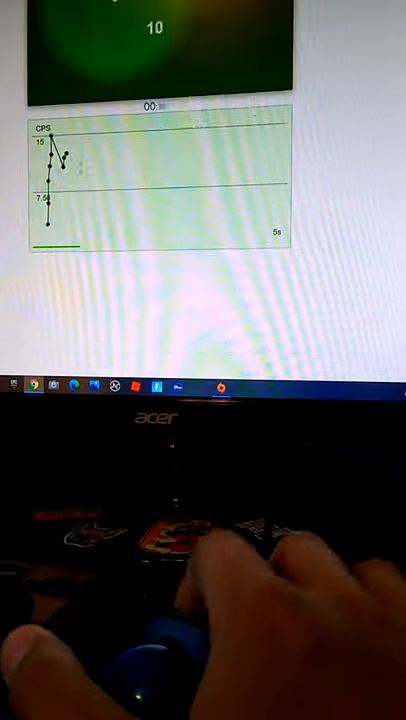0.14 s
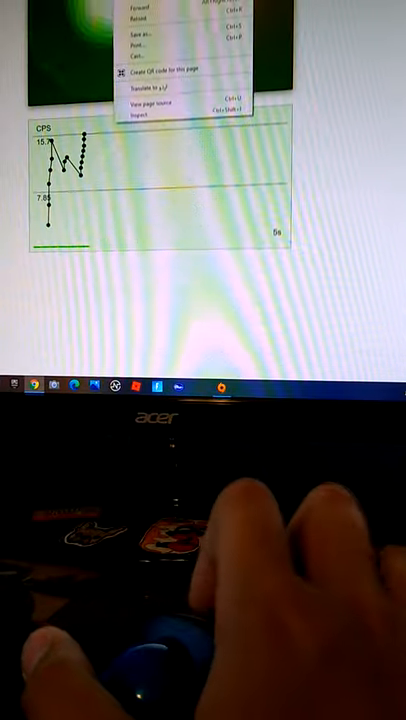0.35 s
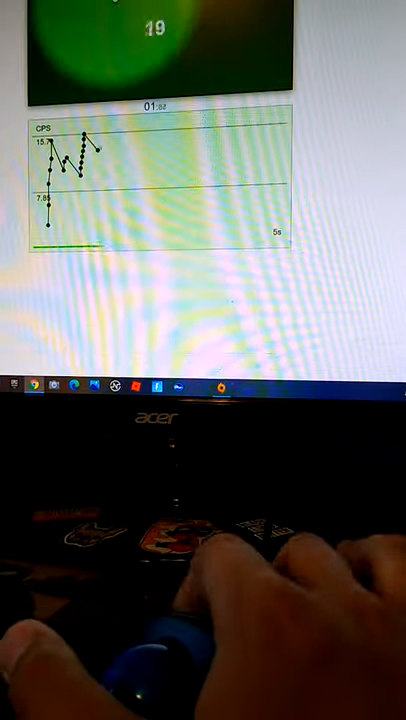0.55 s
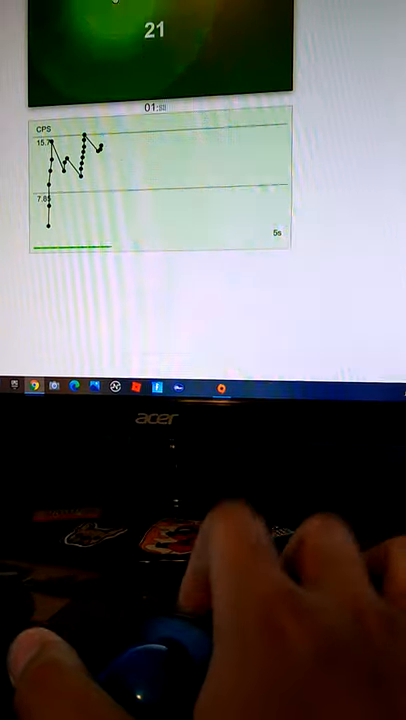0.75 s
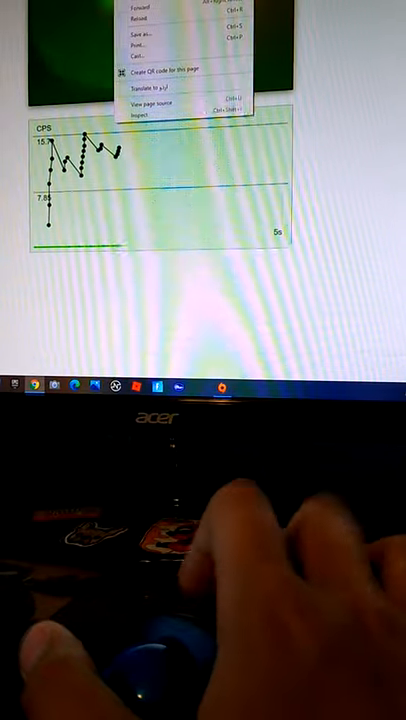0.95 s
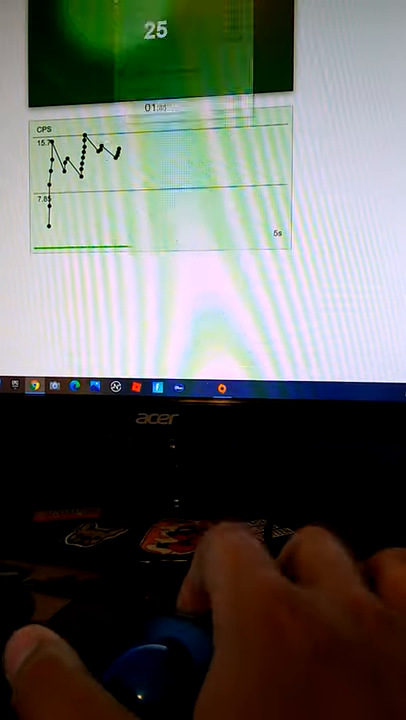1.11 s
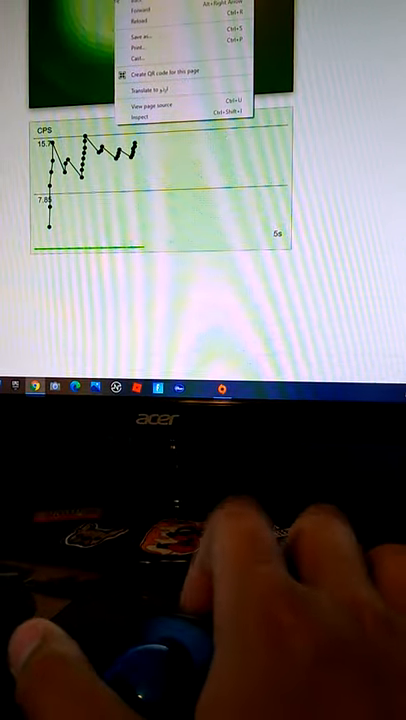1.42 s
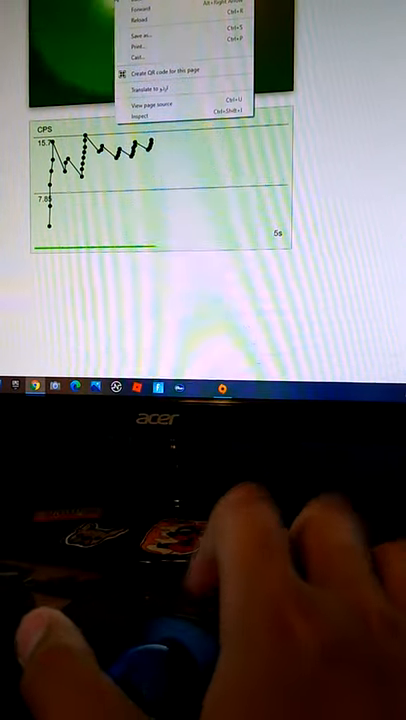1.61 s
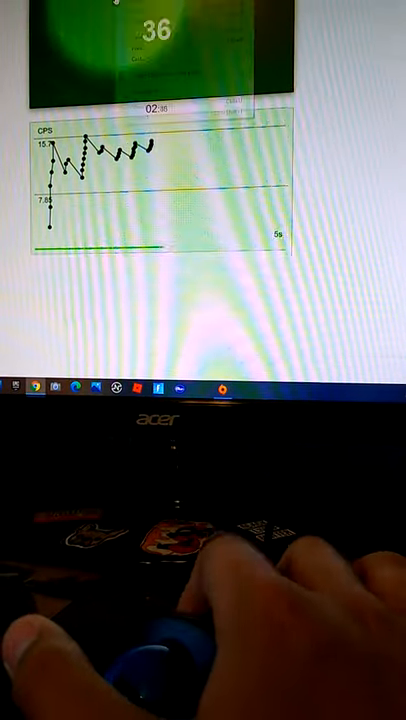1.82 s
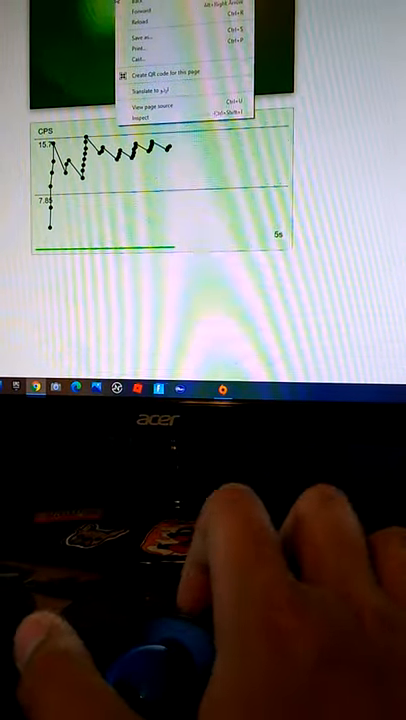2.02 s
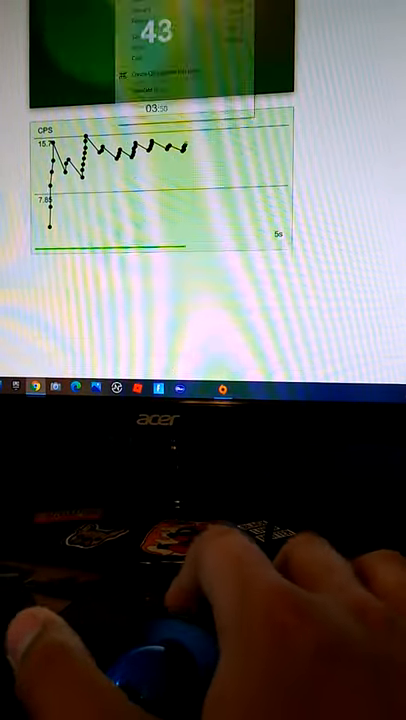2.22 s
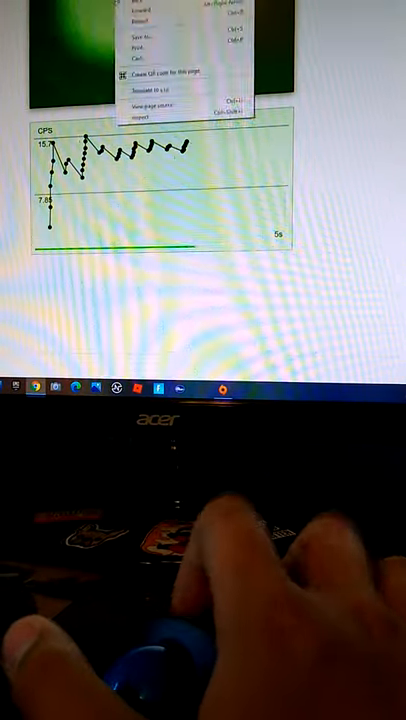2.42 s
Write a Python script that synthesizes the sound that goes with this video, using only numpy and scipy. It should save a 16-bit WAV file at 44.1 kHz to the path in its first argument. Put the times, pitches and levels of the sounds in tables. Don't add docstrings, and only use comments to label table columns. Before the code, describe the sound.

A finger drags over a mouse button, making quick bursts of plastic clicks above faint fan hum

```python
import sys
import numpy as np
from scipy import signal
from scipy.fft import rfft, irfft
from scipy.io import wavfile

SR = 44100
rng = np.random.default_rng(int(sys.argv[2]) if len(sys.argv) > 2 else 0)


def store_wav(level_fs):
    pcm = np.round(np.clip(np.atleast_2d(level_fs), -1, 1) * 32767)
    wavfile.write(sys.argv[1], SR, pcm.T.astype(np.int16))


def rack_gain(trim_db):
    fader = np.asarray(trim_db, float)
    return 10 ** (fader / 20)


N = 112454


def band(x, hz, width):
    return signal.lfilter(*signal.iirpeak(hz, hz / width, fs=SR), x)


def tone():
    # f/Hz, level/dB per Hz
    air_curve = [(25, -105), (50, -84), (150, -93), (300, -99), (480, -109), (1300, -111), (6500, -123),
                 (16000, -123)]
    # f/Hz, width/Hz, left/dB, right/dB
    hum_bands = [(222, 30, -74.5, -77), (404.6, 22, -85, -80.5), (2940, 920, -93, -83),
                 (5250, 780, -98, -91), (12900, 3700, -85.5, -105)]
    fan_hz, fan_db, stir_db = 214.7, -67.5, 3

    hz = np.maximum(np.fft.rfftfreq(N, 1 / SR), 1)
    curve_hz, curve_db = np.array(air_curve).T
    power = rack_gain(2 * np.interp(np.log(hz), np.log(curve_hz), curve_db))
    for centre_hz, width, left_db, right_db in hum_bands:
        peak = rack_gain(2 * np.array([[left_db], [right_db]])) / width
        power = power + peak / (1 + (2 * (hz - centre_hz) / width) ** 4)

    alike = np.clip(1 - np.log2(hz / 300) / 2.36, 0, 0.9)
    both, own = rfft(rng.standard_normal(N)), rfft(rng.standard_normal((2, N)))
    mix = np.sqrt(alike) * both + np.sqrt(1 - alike) * own
    air = irfft(np.sqrt(power * SR / 2) * mix, N)

    t = np.arange(N) / SR
    stir, wobble = (np.interp(t * 25, np.arange(70), rng.standard_normal(70)) for _ in range(2))
    sleeve = band(air, 2900, 4800) * (rack_gain(stir_db * stir) - 1)
    fan_phase = 2 * np.pi * np.cumsum(fan_hz * (1 + 0.001 * stir)) / SR
    fan = rack_gain(fan_db + 1.1 * wobble) * np.sin(fan_phase)
    return air + sleeve + fan


def rattle(times, db, bands, fall_s, lead_s, grain_db, rub_db):
    edge_s, rub_s = 0.0005, 0.026
    t = np.arange(int(0.05 * SR)) / SR
    hits = np.zeros(N)
    hits[(np.maximum(times - lead_s, 0) * SR).astype(int)] = rack_gain(db)
    span = int(rub_s * SR)
    rub = rack_gain(rub_db) * np.convolve(hits, np.hanning(span))[span // 4:][:N]
    burst = np.minimum(t / edge_s, 1) * np.exp(-(t / fall_s / 2) ** 1.43)
    puff = np.convolve(hits, burst)[:N] + rub

    out = 0
    for hz, width, left_db, right_db in bands:
        both, own = rng.standard_normal(N), rng.standard_normal((2, N))
        grain = rack_gain(grain_db * rng.standard_normal(N // 32 + 1)).repeat(32)[:N]
        spread = min(hz / 6000, 2)
        hiss = (both + spread * own) / np.hypot(1, spread) * puff * grain
        hiss = band(band(hiss, hz, width), hz, width) * np.sqrt(SR / 2 / width)
        out = out + hiss * rack_gain(np.array([[left_db], [right_db]]))
    return out


def ring(times, db, modes, push_s, detune, turn, apart, pitch=1):
    apart_hz, scatter_db = 1970, 2
    out = np.zeros((2, N + SR))
    longest_s = max(mode[1] for mode in modes)
    t = np.arange(int(4 * longest_s / 5 * SR)) / SR
    after_push = np.maximum(t - push_s, 0)
    swell = np.sin(np.pi / 2 * np.minimum(t / push_s, 1)) ** 2
    base, t60, left_db, right_db = np.array(modes).T[:, :, None]
    pitches = pitch * np.ones(len(times))
    chances = rng.standard_normal((len(times), 5, len(modes), 1))

    for s, level_db, scale, chance in zip(times, db, pitches, chances):
        tune, left_luck, luck, both, own = chance
        hz = base * scale
        near = np.minimum(hz / apart_hz, 1) ** 2 + apart
        phase = 2 * np.pi * hz * (1 + detune * tune) * (t - push_s) + np.pi / 2 + turn * both
        fade = swell * rack_gain(level_db - 60 * after_push / t60 + scatter_db * luck / 2)
        left = fade * rack_gain(left_db + scatter_db * near * left_luck) * np.sin(phase + near * own)
        right = fade * rack_gain(right_db) * np.sin(phase)
        i = max(int(s * SR), 0)
        out[0, i:i + len(t)] += left.sum(0)
        out[1, i:i + len(t)] += right.sum(0)
    return out[:, :N]


def desk(times, db):
    # f/Hz, t60/s, left/dB, right/dB
    desk_modes = [(84.4, 0.17, -26, -7.5), (137.6, 0.15, -23, -16), (172.3, 0.088, -38, -19),
                  (443, 0.018, -35.5, -16.5), (263, 0.078, -35.5, -29.5)]
    thump = ring(times, db, desk_modes, push_s=0.00305, detune=0.014, turn=0.79, apart=0.82)
    return signal.lfilter(*signal.butter(2, 62, "high", fs=SR), thump)


def finger():
    # t/s, level/dB
    taps = [(.002, -63.5), (0.347, -50.5), (0.359, -63), (0.538, -59.5), (0.556, -51.5), (0.698, -58.5),
            (0.864, -52), (1.02, -60), (1.213, -55), (1.364, -64), (1.387, -63.5), (1.400, -52),
            (1.413, -48), (1.419, -50.5), (1.428, -54), (1.709, -86), (1.731, -44.5), (1.738, -44),
            (1.746, -51), (1.89, -52), (1.999, -66), (2.024, -56), (2.355, -55.5), (2.479, -67),
            (2.513, -72), (2.536, -73)]
    # f/Hz, width/Hz, left/dB, right/dB
    skin = [(890, 800, -12.5, -9), (2060, 380, -22, -14.5), (2830, 900, -13.5, -3), (4130, 1800, -28, -9),
            (9300, 11000, -24, -48)]
    s, db = np.array(taps).T
    pats = rattle(s, db, skin, fall_s=0.0032, lead_s=0.00085, grain_db=4.5, rub_db=-20.5)
    return pats + desk(s, db + 5.5)


def room(x):
    t60_s, level_db = 0.12, -8.5
    t = np.arange(int(0.4 * SR)) / SR
    tail = rng.standard_normal((2, len(t))) * rack_gain(-60 * t / t60_s) * np.minimum(t / 0.00026, 1)
    tail = tail / np.sqrt(np.sum(tail ** 2, axis=1, keepdims=True))
    above = signal.lfilter(*signal.butter(1, 300, "high", fs=SR), x)
    return rack_gain(level_db) * signal.fftconvolve(above, tail, axes=1)[:, :N]


def body():
    # t/s, level/dB, pitch f/Hz
    thuds = [(0.196, -55, 625), (0.212, -40.5, 843), (0.226, -36, 762), (0.237, -42, 1124),
             (0.252, -40, 597), (0.252, -32, 780), (0.281, -46, 610), (0.281, -34.5, 790),
             (0.312, -53, 710), (0.324, -45.5, 724), (0.347, -45, 691), (0.355, -51, 715),
             (0.537, -57, 800), (0.557, -54, 606), (0.567, -54, 694), (0.581, -47, 780),
             (0.589, -33.5, 846), (0.611, -37.5, 766), (0.621, -49, 713), (0.674, -70, 1070),
             (0.695, -60, 790), (0.865, -50, 774), (0.88, -47.5, 1090), (0.902, -42.5, 760),
             (0.928, -47, 1170), (0.928, -33, 816), (0.964, -37.5, 770), (0.984, -50, 674),
             (1.021, -51, 720), (1.206, -55, 770), (1.225, -45, 805), (1.249, -34.5, 790),
             (1.274, -39, 890), (1.308, -40.5, 605), (1.362, -57, 730), (1.385, -56, 694),
             (1.401, -49, 794), (1.414, -51, 798), (1.421, -45.5, 974), (1.547, -50.5, 820),
             (1.56, -43, 790), (1.574, -40.5, 773), (1.599, -37, 674), (1.616, -41, 1020),
             (1.634, -41.5, 727), (1.664, -45, 588), (1.73, -50, 674), (1.747, -44, 1040),
             (1.895, -48, 781), (1.915, -47, 654), (1.928, -46, 704), (1.938, -47, 760),
             (1.969, -40.5, 785), (2.03, -55, 816), (2.225, -43.5, 781), (2.246, -47, 784),
             (2.256, -44, 664), (2.282, -34.5, 766), (2.3, -47, 1060), (2.357, -51.5, 756)]
    # multiple of the pitch, t60/s, left/dB, right/dB
    body_modes = [(0.449, 0.02, -22, -14.5), (0.778, 0.071, -19.5, -14.5), (1.0006, 0.034, -5, -4.5),
                  (1.329, 0.022, -10, -7), (1.85, 0.014, -26.5, -21)]
    s, db, hz = np.array(thuds).T
    return ring(s - 0.001, db, body_modes, push_s=0.002277, detune=0.038, turn=1.59, apart=0.061, pitch=hz)


def spring(times, db):
    # t/s, level/dB
    pings = [(.1966, -51), (0.5453, -58), (0.552, -49), (0.6344, -36.5), (0.6617, -34), (.8745, -46),
             (.9523, -43), (0.976, -37), (1.0139, -51), (1.543, -53), (1.5484, -48), (2.211, -48),
             (2.2207, -48), (2.277, -35), (2.3477, -42), (2.479, -64), (2.548, -55)]
    # f/Hz, t60/s, left/dB, right/dB
    spring_modes = [(4710, 0.013, -11, -4.5), (5210, 0.013, -22, -2.5), (5400, 0.0052, -34, -15),
                    (6560, 0.011, -17.5, -13.5)]
    ping_s, ping_db = np.array(pings).T
    all_s, all_db = np.r_[times, ping_s], np.r_[db + 0.5, ping_db]
    return ring(all_s, all_db, spring_modes, push_s=0.00059, detune=0.05, turn=1.26, apart=0.13)


def shell(times, db):
    # f/Hz, t60/s, left/dB, right/dB
    shell_modes = [(623, 0.1, -25, -24.5), (740, 0.038, -19, -20), (1163, 0.034, -23, -20),
                   (2032, 0.092, -28.5, -30), (2190, 0.025, -25, -19), (2603, 0.017, -22, -5.5),
                   (2944, 0.012, -18, -3), (3600, 0.016, -22.5, -14)]
    return ring(times, db, shell_modes, push_s=0.001716, detune=0.024, turn=0.91, apart=0.12)


def contacts(times, db):
    # f/Hz, width/Hz, left/dB, right/dB
    hiss_bands = [(11180, 2340, -6.5, -18.5), (14120, 2500, -6, -13), (6930, 8000, -14, -17),
                  (4350, 3830, -29, -4.5), (2960, 2100, -20.5, -8.5), (790, 480, -18, -12),
                  (6920, 120, -18, -27)]
    return rattle(times, db, hiss_bands, fall_s=0.0013, lead_s=0.0013, grain_db=4.0, rub_db=-15.5)


def mouse():
    # t/s, shell knock level/dB, contact tick level/dB
    drag_1 = [(0.2122, -30, -44), (0.2194, -41, -45), (0.2245, -33, -38.5), (0.2357, -26, -39),
              (0.2423, -31.5, -37.5), (0.2522, -30.5, -38), (0.2587, -26, -36.5), (0.2673, -36, -37),
              (0.2802, -32, -36), (0.2889, -24.5, -39.5), (0.3014, -76, -36.5), (0.3093, -53, -44),
              (0.3164, -41.5, -36.5), (0.3432, -51, -48)]
    drag_2 = [(0.567, -43.5, -42), (0.5768, -38, -40.5), (0.583, -43, -51), (0.589, -25.5, -36.5),
              (0.5963, -35, -38), (0.6086, -33.5, -35.0), (0.619, -38.5, -39.5), (0.6341, -43, -38.5),
              (0.6478, -55, -38), (0.6627, -47, -53), (0.6713, -45.5, -38.5)]
    drag_3 = [(0.8785, -31, -45), (0.8849, -41, -42), (0.8894, -39, -41.5), (0.9, -37.5, -42),
              (0.904, -40, -38), (0.9126, -38, -38.5), (0.928, -34, -35.5), (0.9352, -32, -36.5),
              (0.9478, -41, -49), (0.952, -41, -38.5), (0.9626, -27, -38), (0.9781, -41, -36),
              (0.9867, -41.5, -42), (1.0131, -46, -47)]
    drag_4 = [(1.2234, -31, -42.5), (1.2331, -35, -34), (1.247, -25.5, -37), (1.2558, -45, -34),
              (1.271, -26.5, -38.5), (1.2819, -31, -37), (1.2911, -65, -54), (1.3006, -46, -36),
              (1.3083, -27.0, -38.5), (1.3199, -57, -40), (1.3381, -43.5, -44.5)]
    drag_5 = [(1.5473, -45.5, -67), (1.5586, -29, -43), (1.569, -36.5, -34), (1.576, -38, -43.5),
              (1.5847, -26, -38), (1.5933, -36, -37.5), (1.597, -32, -42.5), (1.606, -39, -37.5),
              (1.6149, -25.5, -39), (1.6226, -46, -39), (1.6304, -34, -38.5), (1.6629, -32.5, -45),
              (1.6694, -40, -41), (1.681, -57, -53), (1.7313, -36, -54), (1.747, -37, -60.5)]
    drag_6 = [(1.8937, -36, -40), (1.9024, -39.5, -39.5), (1.9133, -27.5, -41.0), (1.9236, -36.5, -37.5),
              (1.9371, -25, -41), (1.946, -41, -42.5), (1.967, -26.5, -43.5), (1.98, -42, -39.5)]
    drag_7 = [(2.2231, -30, -45), (2.2321, -41, -43.5), (2.237, -39, -44), (2.245, -27.5, -41),
              (2.2559, -30, -36), (2.268, -24.5, -37), (2.2811, -29.5, -36.5), (2.2903, -37, -39.5),
              (2.2989, -25.5, -40), (2.3109, -37.5, -34.5), (2.3188, -45, -38)]
    lean_db = [0.51, 0.58, 0.12, 1.2, 0.61, -0.63, 0.56]

    drags = [drag_1, drag_2, drag_3, drag_4, drag_5, drag_6, drag_7]
    s, knock_db, tick_db = np.vstack(drags).T
    effort_db = (knock_db + tick_db) / 2
    weight_db = np.repeat(lean_db, [len(drag) for drag in drags])
    plastic = shell(s, knock_db) + spring(s, effort_db)
    return plastic + desk(s, effort_db + weight_db) + contacts(s, tick_db)


def scene():
    left_late_s = 0.00014
    touch = mouse() + finger()
    wet, air = room(touch), tone()
    near = touch + body()
    late_left = np.roll(near[0], int(left_late_s * SR))
    return np.array([late_left, near[1]]) + wet + air


def top_cut(x):
    return signal.sosfilt(signal.butter(12, 16850, fs=SR, output="sos"), x)


def record(dry):
    low_pass = signal.ellip(8, 0.2, 60, 15950, fs=SR, output="sos")
    cut = signal.sosfilt(low_pass, dry)
    return top_cut(cut)


dry = scene()
out = record(dry)
store_wav(out)
```